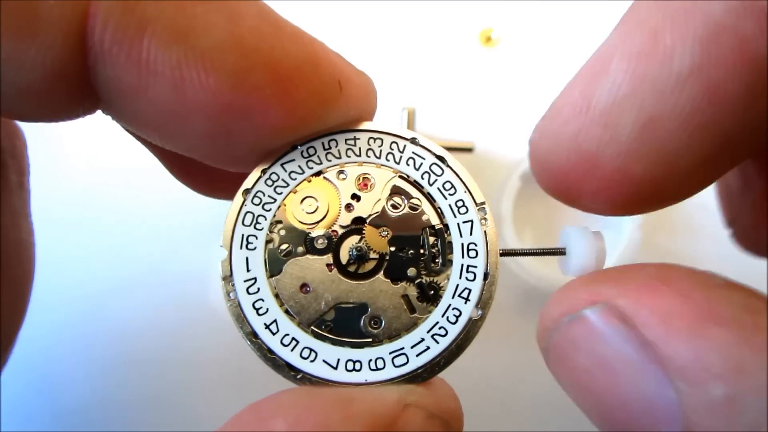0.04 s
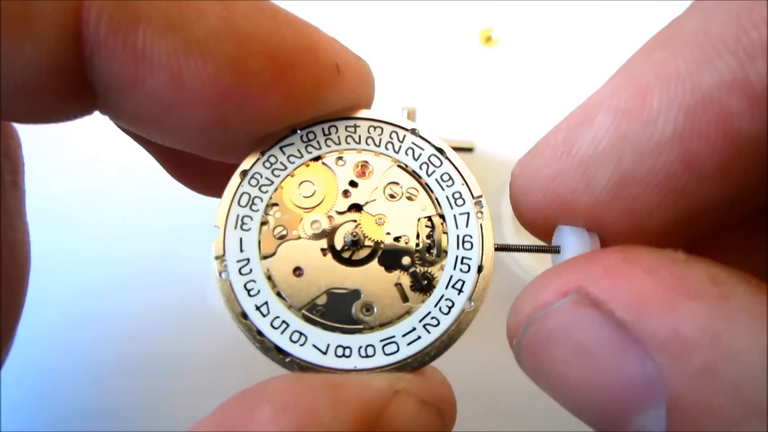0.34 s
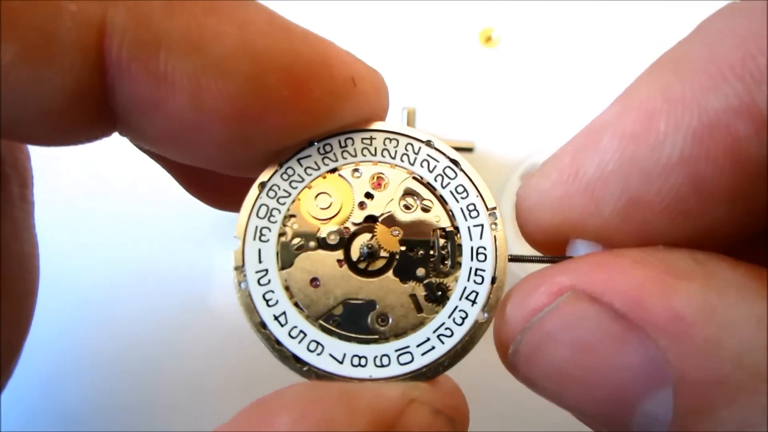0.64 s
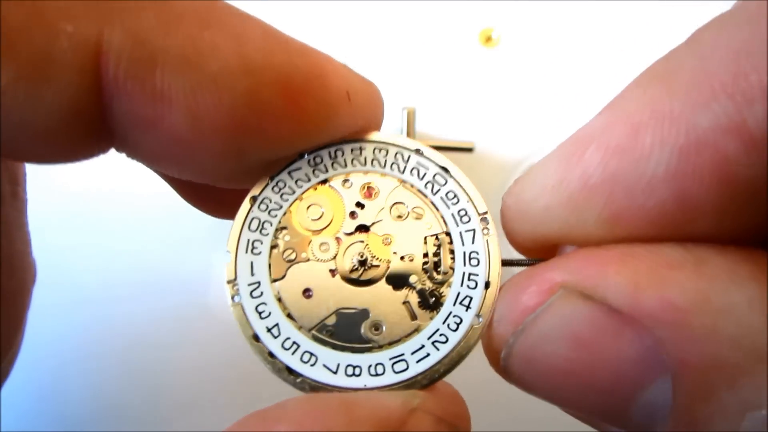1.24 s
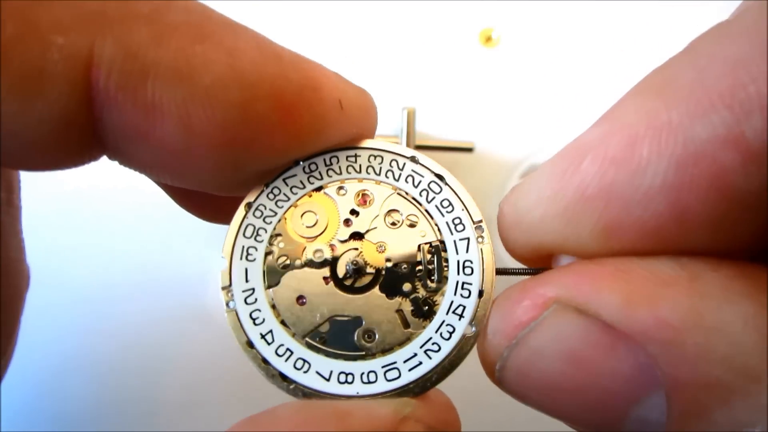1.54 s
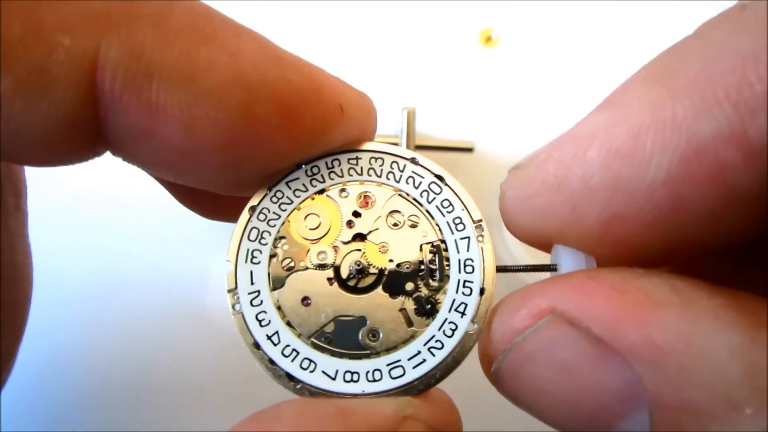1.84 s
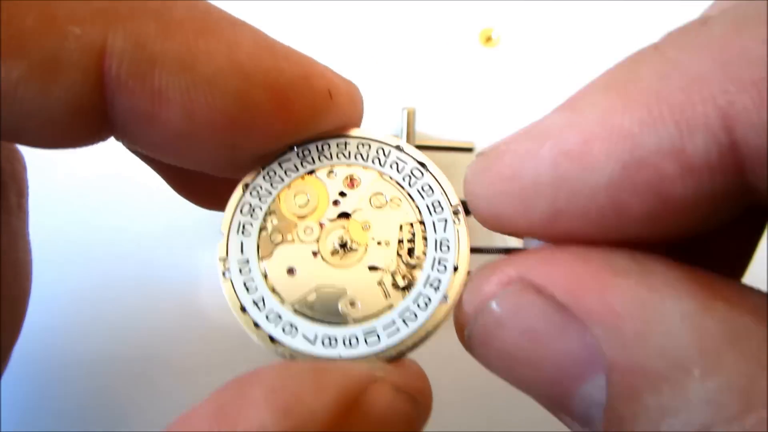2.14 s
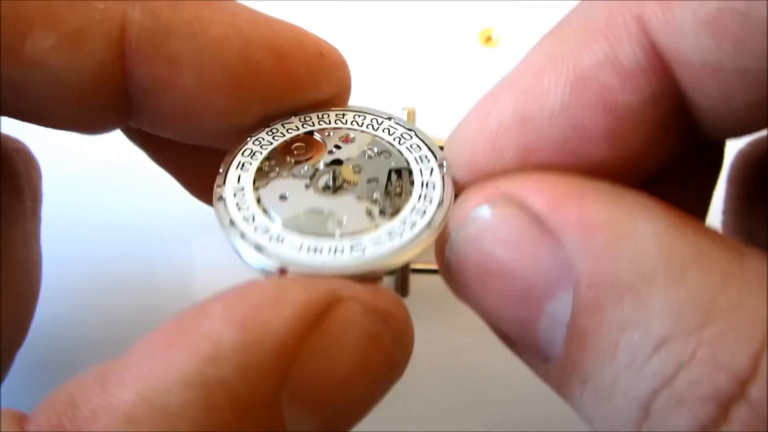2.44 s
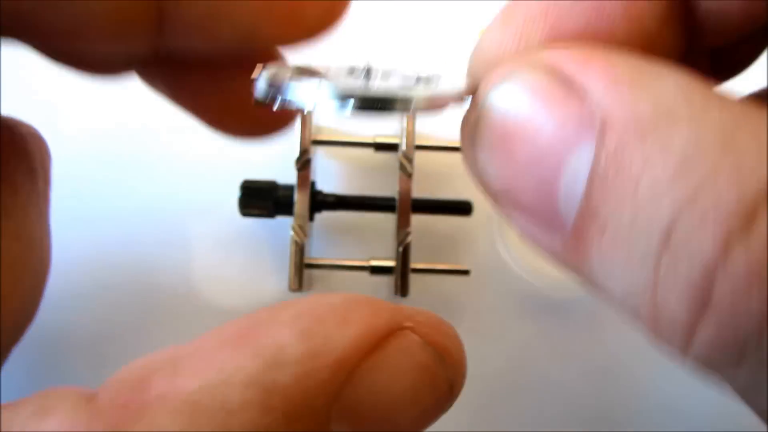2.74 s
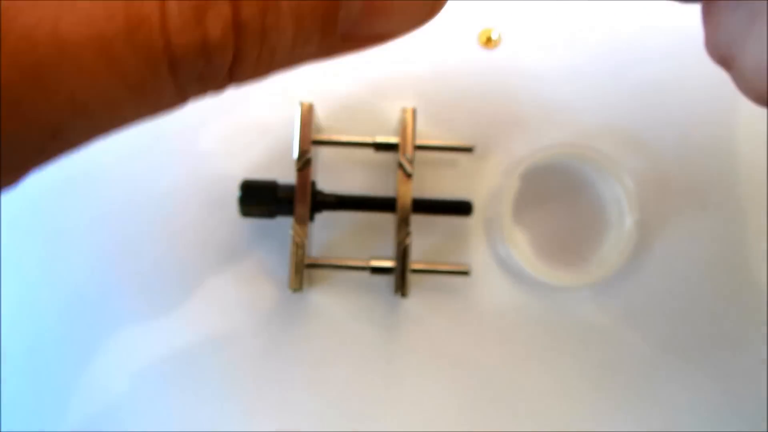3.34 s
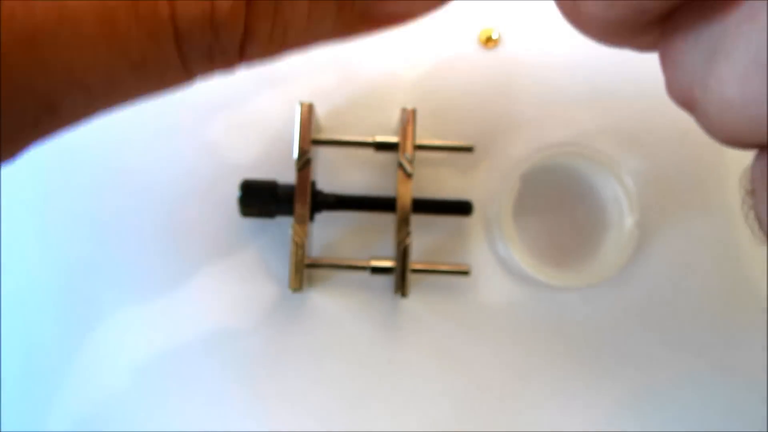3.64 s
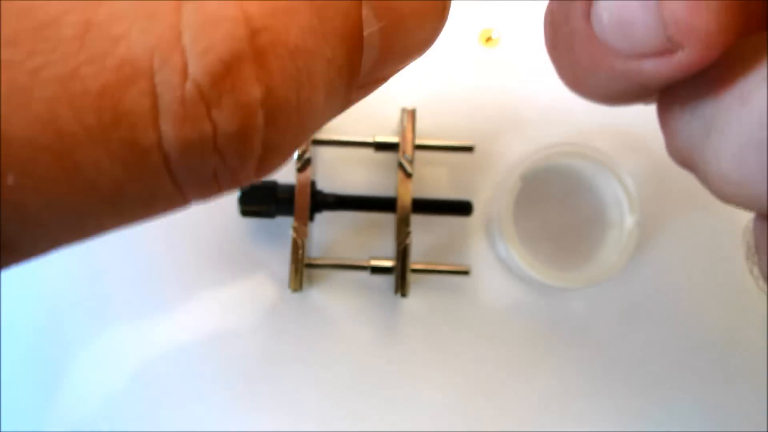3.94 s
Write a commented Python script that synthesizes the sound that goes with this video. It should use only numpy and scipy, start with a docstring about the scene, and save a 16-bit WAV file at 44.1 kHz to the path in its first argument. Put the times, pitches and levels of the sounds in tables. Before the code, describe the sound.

A small watch movement is handled close to the microphone, ticking fast and faintly. Its winding stem snaps in with a sharp click, then it scrapes and rattles briefly against a metal holder. A fan hums in the quiet room.

```python
"""A bare watch movement ticks close by, between the fingers, over the hum of a fan in a quiet room.
Each tick is three escapement impacts exciting the plate's modes; a far clock marks the seconds.
The winding stem snaps home with a crack and a dull knock, and the gain control ducks. Faint whirs and a
thin whistle pass. Lifted out of a small metal holder, the movement scrapes and rattles against it,
driving its resonances; then a finger nudges the holder, stiffening and damping them."""
import sys
import numpy as np
from scipy import signal
from scipy.fft import rfft, irfft
from scipy.io import wavfile

SR = 44100
rng = np.random.default_rng(int(sys.argv[2]) if len(sys.argv) > 2 else 0)


def transcribe(u):
    """Save the signal u as a 16-bit wav file named by the first command-line argument.

    u: samples, shape (n,) or (channels, n), limited to [-1, 1]; the rate is SR.
    q: integer samples, one column per channel.
    """
    v = np.clip(np.atleast_2d(u).T, -1, 1)
    q = np.round(v * 32767).astype(np.int16)
    wavfile.write(sys.argv[1], SR, q)


N = 176400
T = np.arange(N) / SR
FREQS = np.arange(N // 2 + 1) * SR / N
METAL_LOW_HZ, METAL_TOP_HZ = 4900, 14000  # band in which the small metal parts radiate
TREBLE_SHELF = 1 / (1 + (10600 / (FREQS + 1)) ** 10)


def amp(db):
    """Decibels to amplitude ratio."""
    return 10 ** (np.asarray(db) / 20)

def unit(x):
    """Normalisation to unit rms."""
    return x / np.sqrt(np.mean(x ** 2))

def across(points):
    """Interpolation of (frequency, value) points on a logarithmic frequency axis."""
    hz, value = np.array(points).T
    return np.interp(np.log(FREQS + 1), np.log(hz), value)

def shape(x, response):
    """Linear filtering: the spectrum is multiplied by a frequency response."""
    return irfft(rfft(x) * response, N)

def resonance(hz, width):
    """Response of a damped oscillator, unity at resonance."""
    return 1j * FREQS * width / (hz ** 2 - FREQS ** 2 + 1j * FREQS * width)

def body(modes):
    """Modal superposition: a body's response is the sum of its resonances."""
    return sum(amp(db) * resonance(hz, width) for hz, width, db in modes)

def powered(response):
    """Normalisation of a response to unit power gain for white noise."""
    return response / np.sqrt(np.mean(abs(response) ** 2))

def noise(width):
    """Partly coherent stereo noise: width 0 is mono, 1 is uncorrelated."""
    mid, side = rng.standard_normal((2, N))
    return np.array([mid + width * side, mid - width * side]) / np.hypot(1, width)

def narrowband(hz, width):
    """Stereo noise band-limited by two equal resonances in cascade."""
    return unit(shape(noise(.55), resonance(hz, width) ** 2))

def wander(rate_hz):
    """Random modulation: low-passed noise of unit rms."""
    return unit(shape(rng.standard_normal(N), np.exp(-(FREQS / rate_hz) ** 2)))

def bursts(rows):
    """Incoherent addition: exponential decays (time [s], level [dB], decay [s]) sum in power."""
    power = np.zeros(N)
    for start, db, decay in rows:
        span = slice(max(int(start * SR), 0), max(int((start + 10 * decay) * SR), 0))
        power[span] += (amp(db) * np.exp(-(T[span] - start) / decay)) ** 2
    return np.sqrt(power)

def ring(start, hz, t60, rise_s, phase=0):
    """Free vibration of a struck mode: a damped sinusoid with a smooth onset."""
    age = np.clip(T - start, 0, 2 * t60)
    onset = 1 - np.exp(-(age / rise_s) ** 2)
    return np.cos(2 * np.pi * hz * age + phase) * np.exp(-np.log(1000) * age / t60) * onset


# spectrum of the fan and room noise (frequency [Hz], relative density [dB])
AIR_SPECTRUM = [(20, -35), (43, -15.5), (69, -12), (91, -2), (119, -5), (156, -3), (221, -4.5), (260, -1.5),
                (399, -10), (482, -9), (582, -12), (631, -7), (703, -14), (782, -6.5), (848, -15.5),
                (1110, -8), (1240, -12.5), (1950, -23.5), (2600, -30.5), (3300, -37), (3850, -44.5),
                (4700, -37), (7000, -36), (9000, -39), (11500, -45), (13200, -46), (15500, -52)]
# likeness of that noise in left and right (frequency [Hz], correlation [-1 to 1])
AIR_CORRELATION = [(60, 0.61), (110, -0.44), (220, 0.41), (400, 0.016), (750, 0.19), (1200, -0.24),
                   (2400, 0.35), (8000, 0.0045)]
# its balance (frequency [Hz], left minus right [dB])
AIR_BALANCE = [(100, 1), (200, -.5), (400, 0), (700, -3.5), (1300, 0), (4000, 0)]
# fan tones and a thin electrical one (frequency [Hz], left level [dB], right level [dB], width [Hz])
HUM_TONES = [(101, -58, -64, 5), (167, -63, -63, 6), (258, -60, -60, 8), (469, -67, -67, 4),
             (494, -65, -65, 4), (657, -66, -63, 2), (802, -58.5, -56.5, 2.2), (1095, -65, -62, 16),
             (1202, -73, -72, 10), (1329, -71, -71, 12), (1480, -76, -75, 20), (1905, -77, -73, 4),
             (15735, -88, -88, 10)]
# electrical whine (frequency [Hz], level [dB], bandwidth [Hz])
WHINE_BANDS = [(7880, -78, 120), (13000, -88, 80)]

def fan_and_room():
    """Broadband plus tonal noise: partly correlated fan noise, wavering tones and electrical whine."""
    mid, side = rng.standard_normal((2, N))
    correlation = np.clip(across(AIR_CORRELATION), -.9, .9)
    colour = powered(amp(across(AIR_SPECTRUM)))
    mid = shape(mid, colour * np.sqrt((1 + correlation) / 2))
    side = shape(side, colour * np.sqrt((1 - correlation) / 2))
    balance = amp(np.outer([1, -1], across(AIR_BALANCE)) / 2)
    air = amp(-43) * shape(np.array([mid + side, mid - side]), balance)
    bass = shape(air, 1 / (1 + (FREQS / 400) ** 2))
    air += bass * (amp(.7 * wander(rate_hz=6.6)) - 1)  # the low end swells and sinks
    for hz, left, right, width in HUM_TONES:
        phase = 2 * np.pi * np.cumsum(hz + width / 2 * wander(width)) / SR
        channel_phase = np.array([[0], [rng.uniform(1, 1.01)]])
        air += np.sqrt(2) * amp([[left], [right]]) * np.sin(phase + channel_phase)
    return air + sum(amp(db) * narrowband(hz, width) for hz, db, width in WHINE_BANDS)


# impacts within a beat: unlocking, impulse, drop (lead time [s], relative level [dB])
BEAT_IMPACTS = [(.0063, -11), (.0038, -15), (.0003, -1.5)]
# strength of the beats as the watch is turned (time [s], level [dB])
BEAT_LEVELS = [(.09, -41), (.47, -42), (.72, -38), (.9, -33.5), (1.1, -38), (1.47, -34.5), (1.84, -44),
               (2.09, -40), (2.4, -44), (2.97, -47), (3.47, -37.5), (3.97, -41)]
# modes of the plate (frequency [Hz], bandwidth [Hz], relative level [dB])
PLATE_MODES = [(9600, 1000, -7), (12200, 400, -6), (12800, 300, 1), (13400, 480, 0), (14200, 800, -7)]

def escapement(first_s=.0925, period_s=.12506, jitter_s=.0004, mix_scatter_db=3):
    """Impulse excitation: eight beats a second, three impacts each, ring the plate in a varying mix."""
    beats = np.arange(first_s, N / SR, period_s)
    levels = np.interp(beats, *np.array(BEAT_LEVELS).T) + rng.standard_normal(len(beats))
    force = np.zeros(N)
    for lead, db in BEAT_IMPACTS:
        times = beats - lead + jitter_s * rng.standard_normal(len(beats))
        force[np.clip(times * SR, 0, N - 1).astype(int)] += amp(levels + db)
    radiation = 1 / (1 + (FREQS / METAL_TOP_HZ) ** 20) / (1 + (METAL_LOW_HZ / (FREQS + 1)) ** 4)
    radiation /= np.sqrt(np.mean(abs(body(PLATE_MODES) * radiation) ** 2))
    mix = amp(mix_scatter_db * rng.standard_normal((len(beats), len(PLATE_MODES))))
    return sum(shape(force * np.interp(T, beats, gain), body([mode]) * radiation)
               for mode, gain in zip(PLATE_MODES, mix.T))


# parts of one clock step (delay [s], level [dB], decay [s])
STEP_BURSTS = [(0, -58, .04), (.029, -64, 0.067), (0.048, -61, .04)]
# spectrum of the step (frequency [Hz], relative level [dB])
STEP_SPECTRUM = [(3000, -19), (4500, -6.5), (5600, -1.5), (6900, 3), (8500, -3.5), (11000, -7),
                 (13000, -14), (15500, -32)]

def far_clock(first_s=.293):
    """Diffuse sound: one step a second, smeared by the room into decaying noise."""
    steps = [(first_s + second + delay, db, decay)
             for second in range(N // SR) for delay, db, decay in STEP_BURSTS]
    return shape(noise(.9) * bursts(steps), powered(amp(across(STEP_SPECTRUM))))


# rumbles of the hands (time [s], half-length [s], frequency [Hz], level [dB])
GRIP_RUMBLES = [(.44, .13, 170, -50), (.79, .09, 47, -56), (2.2, .2, 240, -55), (3.55, .12, 260, -52)]

def hands():
    """Handling noise: low bands swell under Gaussian envelopes as the grip shifts."""
    return sum(amp(db) * np.exp(-((T - time) / half_length) ** 2) * narrowband(hz, hz / 2)
               for time, half_length, hz, db in GRIP_RUMBLES)


# modes of the movement (frequency [Hz], relative level [dB], T60 [s], left minus right [dB])
MOVEMENT_MODES = [(1560, -14, .004, 14), (2480, -10.5, .008, -2), (4620, -17, .006, 0),
                  (5080, -14, .0077, -7), (5950, -12, .0066, 2), (6910, -2.5, .0078, -3),
                  (7190, -12, .0055, -9), (8150, -5, .0043, 3), (8860, -10, .008, 0), (9850, -11, .012, 2),
                  (10200, -11, .0044, -16), (12160, -11, .009, 8), (13150, 0, .006, 5),
                  (13510, .7, .0045, 8), (14700, -6.5, .0047, 5), (15640, -11, .0034, 11)]

def stem_snap(time_s=1.2669, modes_db=-10.5, rise_s=.0004, right_lag_s=.000018):
    """Transient response: the stem cracks home, and finger-damped modes reach the left channel first."""
    crack = noise(.3) * bursts([(time_s, -27, .0007)])
    snap = shape(crack, powered(resonance(hz=9500, width=10000) ** 2))
    for hz, db, t60, pan in MOVEMENT_MODES:
        snap[0] += amp(modes_db + db + pan / 2) * ring(time_s, hz, t60, rise_s)
        snap[1] += amp(modes_db + db - pan / 2) * ring(time_s + right_lag_s, hz, t60, rise_s)
    return snap


# blows hard enough to knock (time [s], relative level [dB])
HARD_BLOWS = [(1.2669, 0), (2.602, -22), (2.6998, -24)]
# modes of the knock (delay [s], frequency [Hz], T60 [s], left level [dB], right level [dB])
KNOCK_MODES = [(.0005, 185, .019, -25, -13.5), (.0001, 520, .006, -28, -19)]

def knocks(low_cut_hz=55):
    """Heavy damping: hard blows excite two low modes of opposite polarity, heard as a dull knock."""
    thud = np.zeros((2, N))
    for time, db in HARD_BLOWS:
        for k, (delay, hz, t60, left, right) in enumerate(KNOCK_MODES):
            mode = ring(time + delay, hz, t60, rise_s=.0002, phase=np.pi / 2)
            thud += (-1) ** k * amp(db) * amp([[left], [right]]) * mode
    return shape(thud, 1j * FREQS / (low_cut_hz + 1j * FREQS))


# background whirs (time [s], half-length [s], frequency [Hz], level [dB], bandwidth [Hz])
WHIR_BANDS = [(1.95, .05, 5120, -77, 90), (2.35, .4, 2560, -71, 160), (2.89, .05, 5100, -78, 90),
              (3.89, .04, 5130, -77, 90)]

def whirs():
    """Narrowband noise carries a pitch: faint whirs swell and fade."""
    return sum(amp(db) * np.exp(-((T - time) / half_length) ** 2) * narrowband(hz, width)
               for time, half_length, hz, db, width in WHIR_BANDS)


# arch of a thin whistle as the movement is turned over (time [s], frequency [Hz], level [dB])
WHISTLE_GLIDE = [(1.93, 9300, -84), (2.08, 9950, -78), (2.2, 10850, -76.5), (2.42, 11450, -78),
                 (2.54, 11200, -76), (2.62, 10600, -75), (2.7, 9900, -76)]

def whistle(waver_hz=115, flicker_db=4):
    """Random frequency and amplitude modulation roughen a barely audible gliding tone."""
    times, hz, db = np.array(WHISTLE_GLIDE).T
    pitch = np.interp(T, times, hz) + waver_hz * wander(rate_hz=212)
    envelope = np.interp(T, times, amp(db), left=0, right=0)
    flicker = amp(flicker_db * wander(rate_hz=39))
    return envelope * flicker * np.sin(2 * np.pi * np.cumsum(pitch) / SR)


# contacts of metal on the holder (time [s], level [dB], decay [s], treble gain [dB])
HOLDER_CONTACTS = [(2.304, -53.5, 0.0036, 1), (2.5100, -40, .0014, -3), (2.5133, -45, .001, 0),
                   (2.5166, -37.5, 0.0044, -15), (2.521, -40.5, 0.0022, -9), (2.5243, -44, .002, -10),
                   (2.551, -41, .001, -4), (2.5529, -32.5, 0.00091, -8), (2.6005, -33.5, .0015, 3),
                   (2.6038, -37, .002, -4), (2.6057, -34.5, 0.0014, -6), (2.61, -38, 0.0014, -9),
                   (2.6962, -33, 0.0016, 4), (2.6990, -27, 0.0012, 2), (2.7004, -26.5, 0.0012, 3),
                   (2.7033, -34, .001, 0), (2.707, -42, 0.0021, -7), (2.7185, -63, .002, 2),
                   (2.7345, -58, .003, 7), (2.835, -49.5, 0.0045, -2), (3.0940, -50, .003, -4),
                   (3.097, -45, 0.0024, 2), (3.1, -48.5, 0.0017, 7), (3.129, -52, .002, -4),
                   (3.144, -49.5, .003, -3), (3.1468, -51.5, .003, -5), (3.218, -65, .003, 4),
                   (3.841, -54, 0.0034, 3), (3.925, -54, 0.0079, -2)]
# friction of the movement along the jaws (time [s], level [dB])
JAW_FRICTION = [(2.5, -76), (2.57, -76), (2.625, -63), (2.645, -62), (2.655, -58.5), (2.69, -58.5),
                (2.712, -78), (2.76, -77)]
# modes of the holder carrying the movement (frequency [Hz], bandwidth [Hz], relative level [dB])
LOADED_MODES = [(6100, 230, -2), (6780, 170, 2), (7100, 130, 5.5), (8000, 250, -4), (8500, 300, -4),
                (9250, 450, -10), (12300, 250, -5), (13600, 700, -2.5), (14150, 300, -2)]
# modes of the empty holder (frequency [Hz], bandwidth [Hz], relative level [dB])
FREE_MODES = [(6380, 200, -10), (7100, 300, -6), (7970, 220, 11), (8850, 300, 0), (9540, 200, -3),
              (10700, 200, -2), (12320, 170, 9), (13600, 450, -6)]

def holder_rattle(lift_s=2.63, finger_s=3, stiffening=1.027, damping=1.6):
    """Impact and friction drive the holder's modes; unloading raises them, a finger lifts and damps them."""
    grit = noise(.37)
    times, levels = np.array(JAW_FRICTION).T
    friction = grit * amp(np.interp(T, times, levels)) * (T > times[0]) * (T < times[-1])
    plain = grit * bursts([(time, db, decay) for time, db, decay, _ in HOLDER_CONTACTS])
    bright = grit * bursts([(time, db + treble, decay) for time, db, decay, treble in HOLDER_CONTACTS])
    impacts = plain + shape(bright - plain, TREBLE_SHELF)
    radiation = 1 / (1 + (METAL_LOW_HZ / (FREQS + 1)) ** 3) / (1 + (FREQS / METAL_TOP_HZ) ** 20)
    touched_modes = [(hz * stiffening, width * damping, db) for hz, width, db in FREE_MODES]
    states = ((LOADED_MODES, T < lift_s),
              (FREE_MODES, (T >= lift_s) & (T < finger_s)),
              (touched_modes, T >= finger_s))
    drives = ((impacts, -13.5), (friction, -1))  # non-resonant part [dB]: the slide is mostly scrape
    return sum(shape(force * active, powered((body(modes) + amp(direct_db)) * radiation))
               for modes, active in states for force, direct_db in drives)


def reverberate(x, t60=.25, tail_db=-25, treble_db=3):
    """Reverberation: convolution with decaying noise adds a weak, short, bright room tail."""
    tail = noise(.8) * np.exp(-np.log(1000) * T / t60) * (T > .004)
    tail /= np.sqrt(np.sum(tail ** 2) / 2)
    tail = shape(tail, amp(treble_db * TREBLE_SHELF))
    return x + amp(tail_db) * signal.fftconvolve(x, tail, axes=1)[:, :N]

def scene():
    """Superposition: the watch and holder, with their reverberation, add to the fainter sounds around."""
    watch = reverberate(stem_snap() + knocks() + holder_rattle() + escapement())
    return watch + whistle() + far_clock() + hands() + fan_and_room() + whirs()

def record(dry):
    """Automatic gain control: a loud peak lowers the gain, which creeps back; a low-pass cuts the top."""
    threshold_db, max_cut_db, attack_s, release_db_per_s, top_hz = -18, 4.7, .009, 5.6, 16200
    peak_db = 20 * np.log10(abs(dry).max(axis=0) + 1e-9)
    excess_db = np.clip(peak_db - threshold_db, 0, max_cut_db)
    held_db = np.maximum.accumulate(excess_db + release_db_per_s * T) - release_db_per_s * T
    pole = np.exp(-1 / (attack_s * SR))
    cut_db = signal.lfilter([1 - pole], [1, -pole], held_db)
    low_pass = signal.ellip(8, .2, 80, top_hz, fs=SR, output="sos")
    return signal.sosfilt(low_pass, dry * amp(-cut_db))


dry = scene()
out = record(dry)
transcribe(out)
```